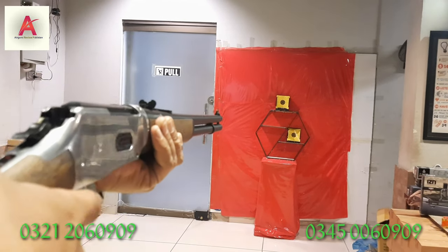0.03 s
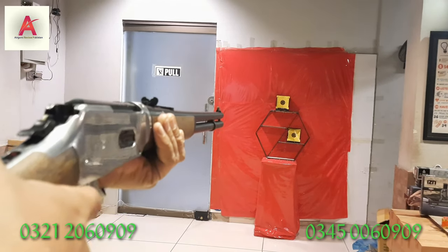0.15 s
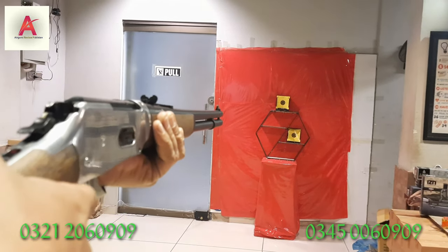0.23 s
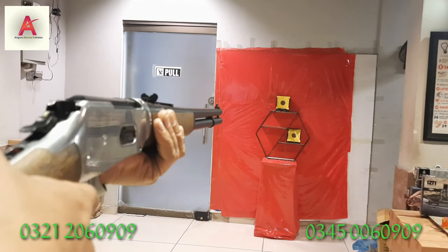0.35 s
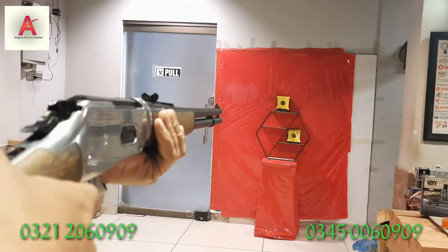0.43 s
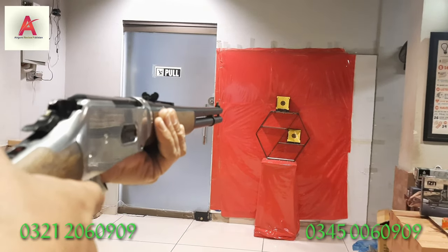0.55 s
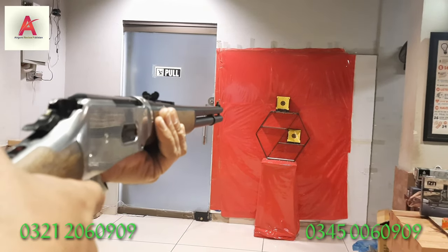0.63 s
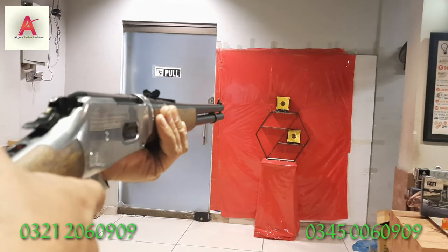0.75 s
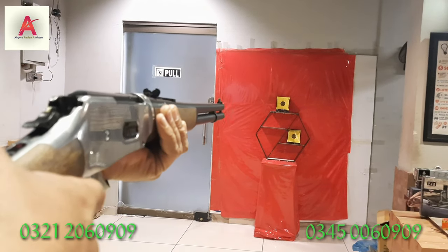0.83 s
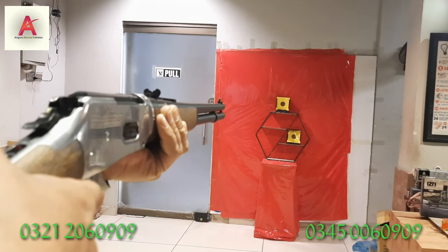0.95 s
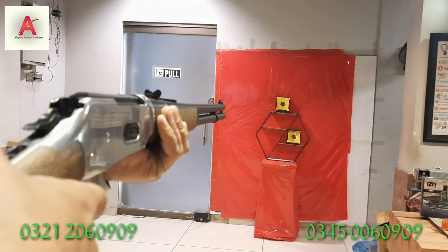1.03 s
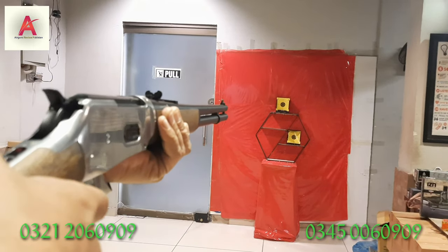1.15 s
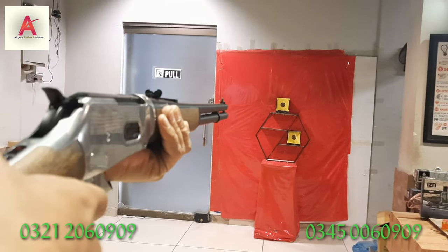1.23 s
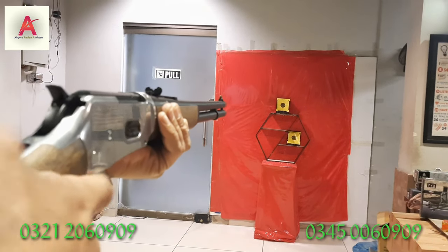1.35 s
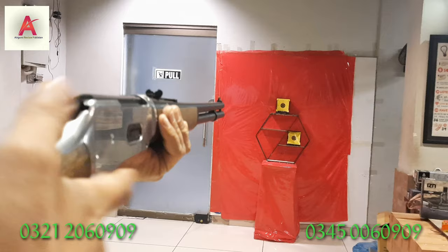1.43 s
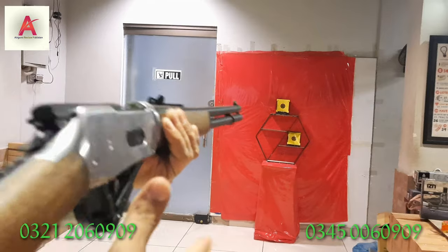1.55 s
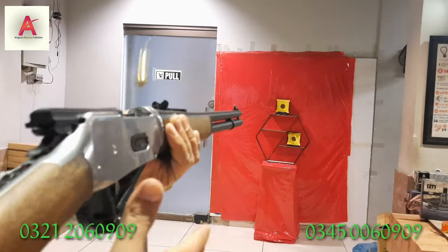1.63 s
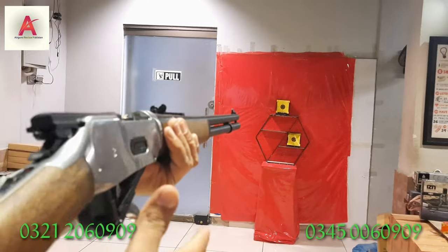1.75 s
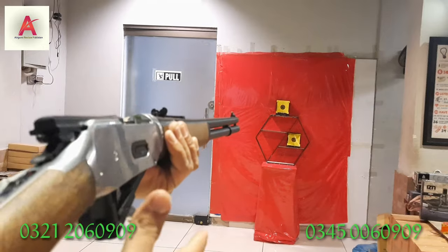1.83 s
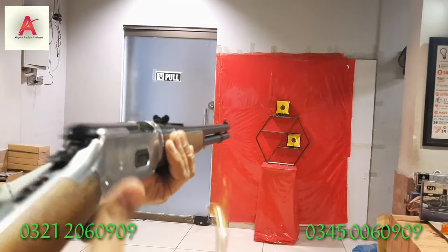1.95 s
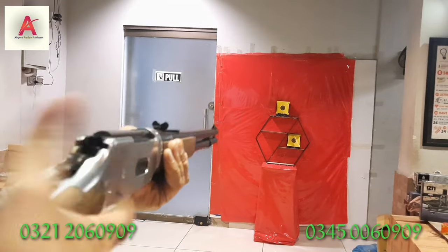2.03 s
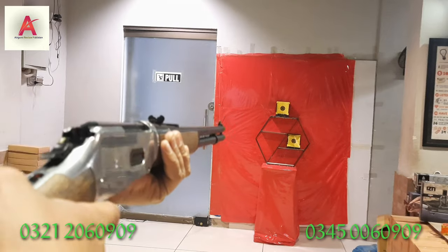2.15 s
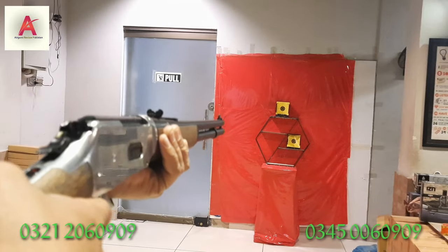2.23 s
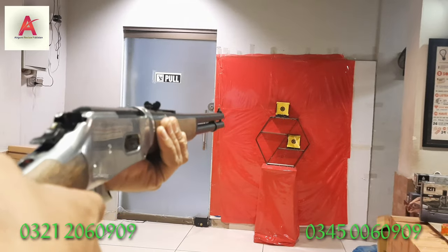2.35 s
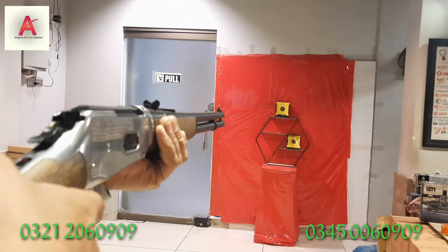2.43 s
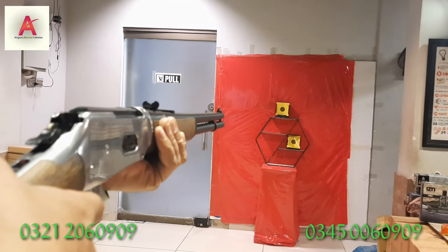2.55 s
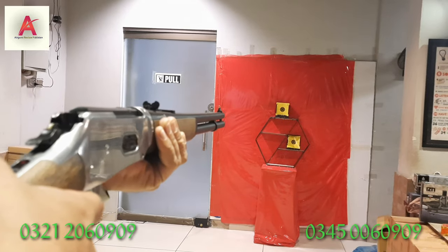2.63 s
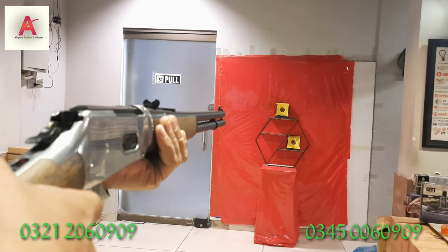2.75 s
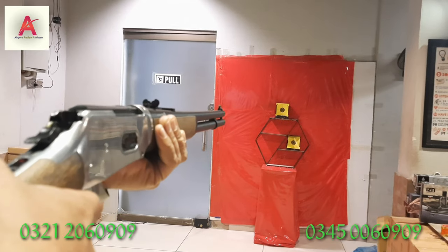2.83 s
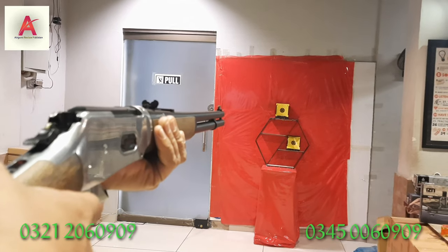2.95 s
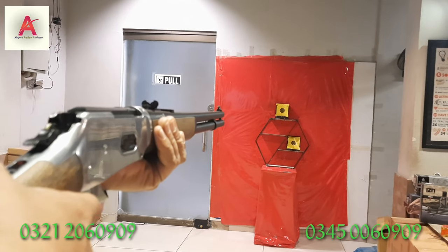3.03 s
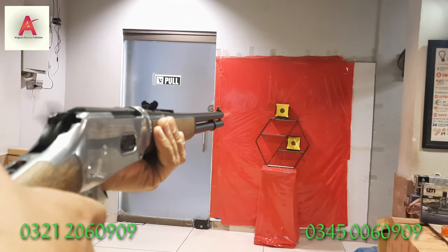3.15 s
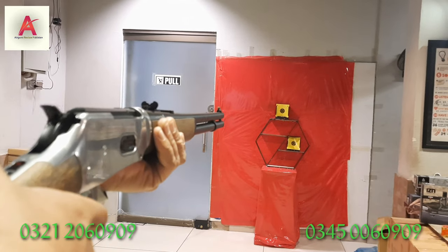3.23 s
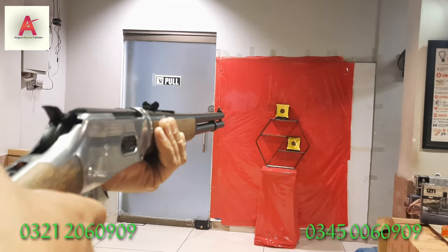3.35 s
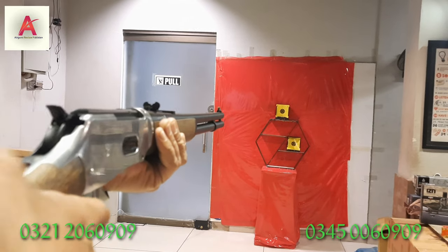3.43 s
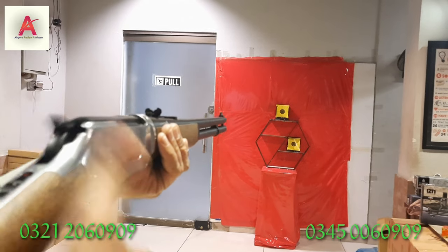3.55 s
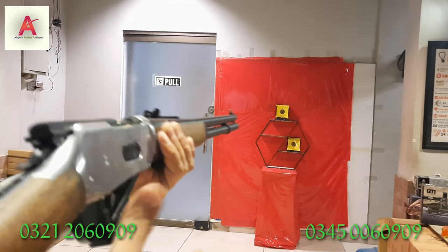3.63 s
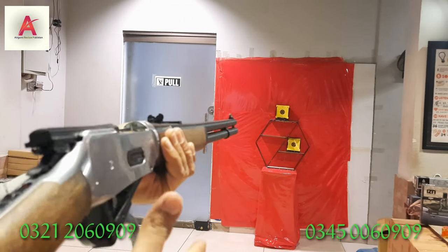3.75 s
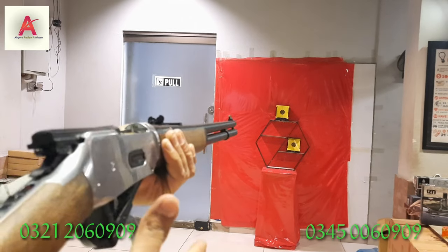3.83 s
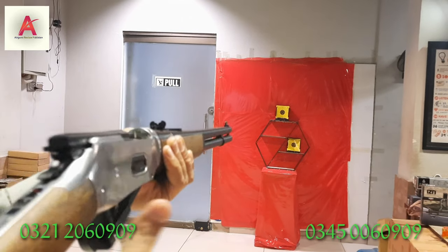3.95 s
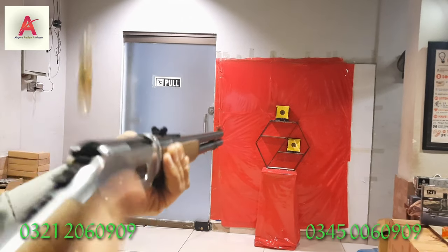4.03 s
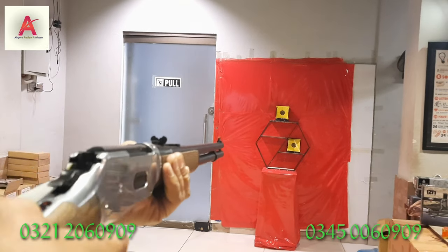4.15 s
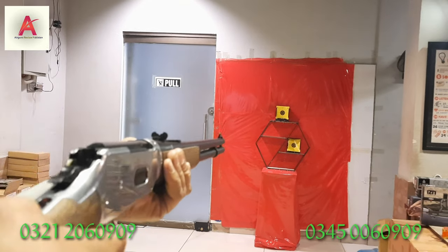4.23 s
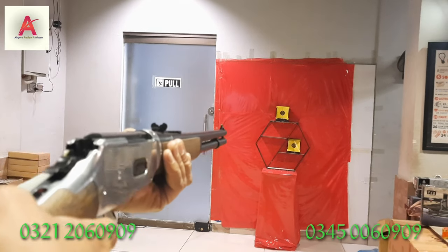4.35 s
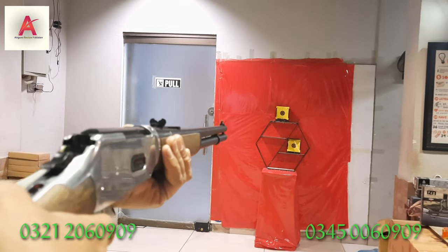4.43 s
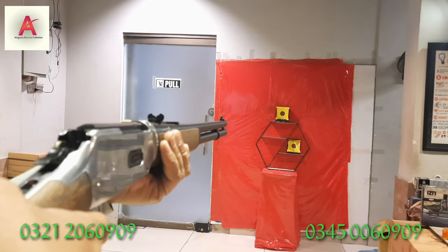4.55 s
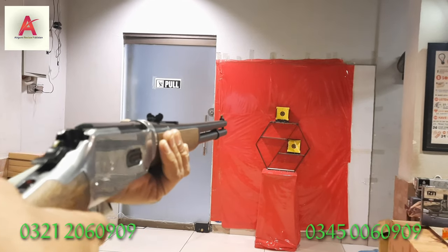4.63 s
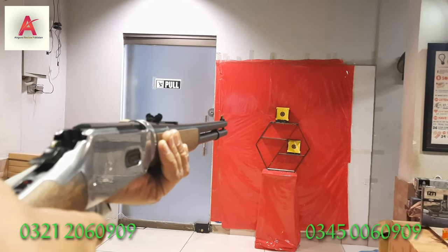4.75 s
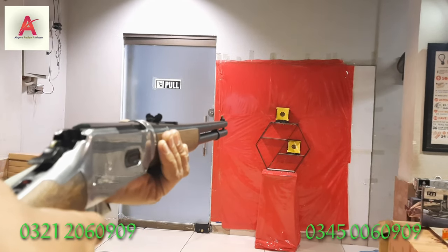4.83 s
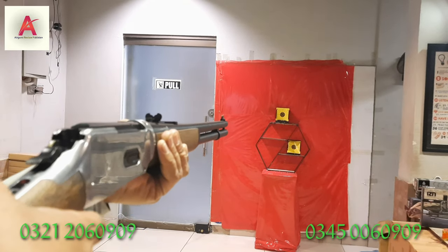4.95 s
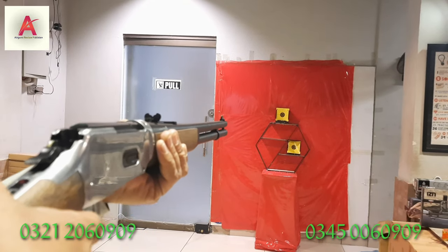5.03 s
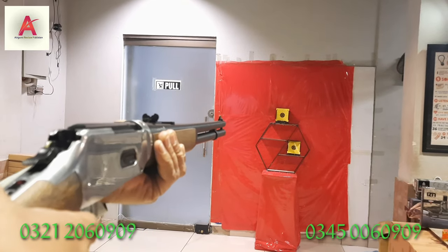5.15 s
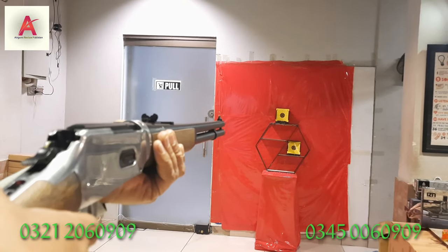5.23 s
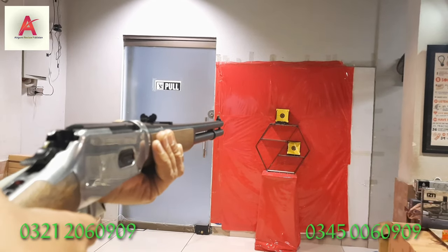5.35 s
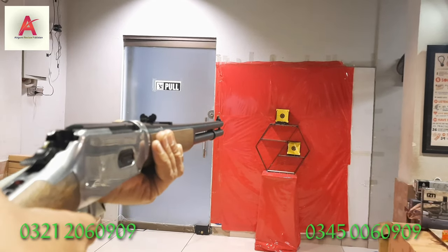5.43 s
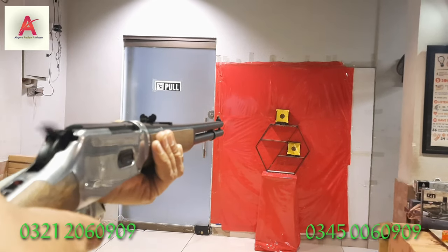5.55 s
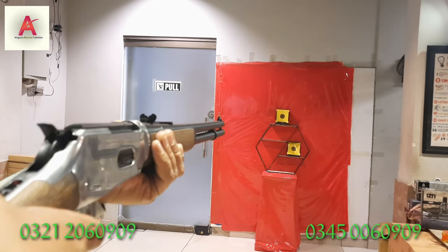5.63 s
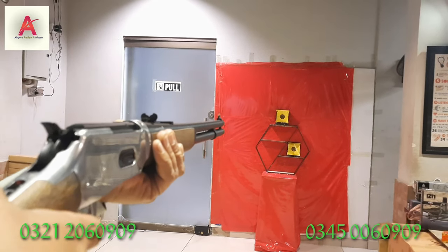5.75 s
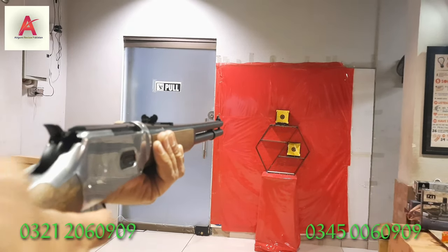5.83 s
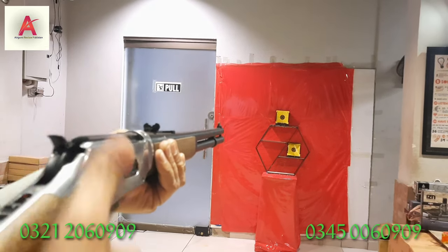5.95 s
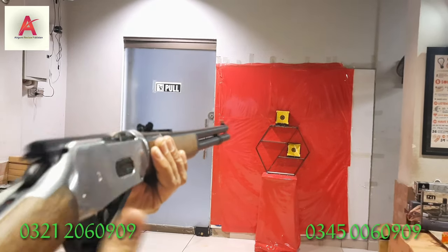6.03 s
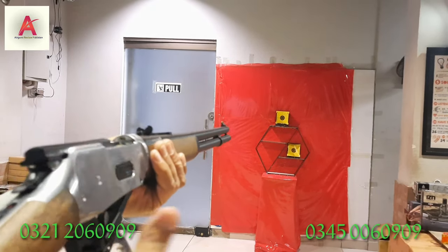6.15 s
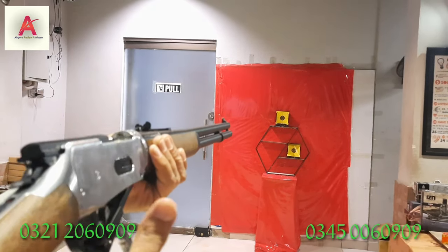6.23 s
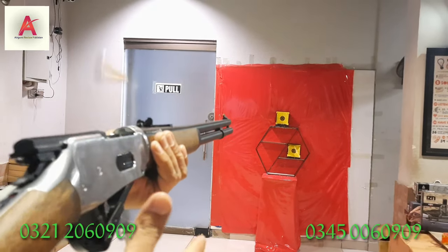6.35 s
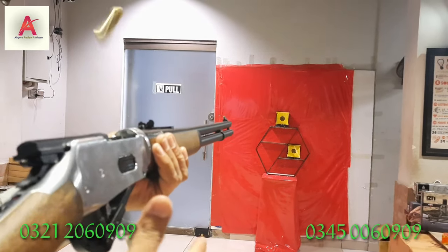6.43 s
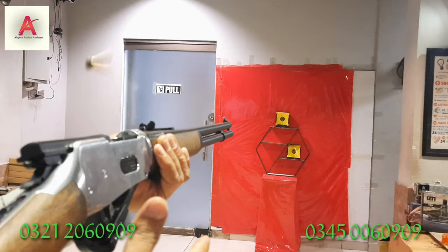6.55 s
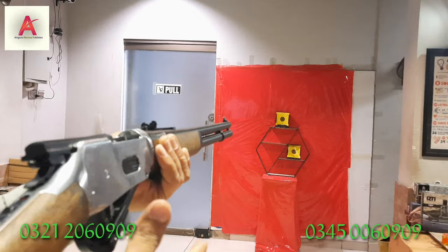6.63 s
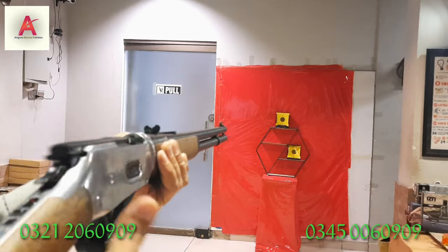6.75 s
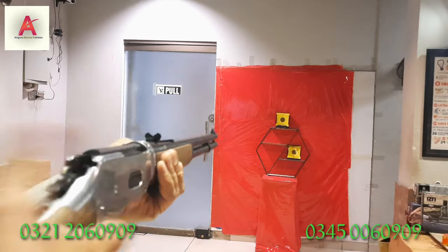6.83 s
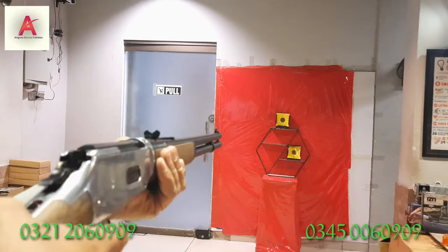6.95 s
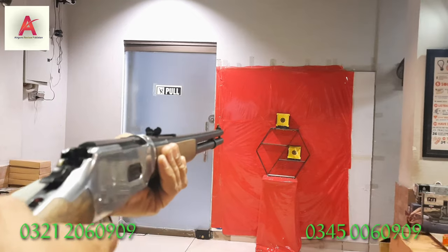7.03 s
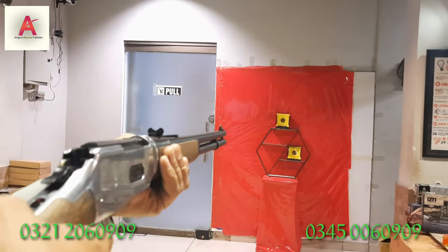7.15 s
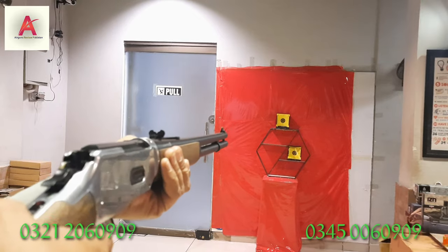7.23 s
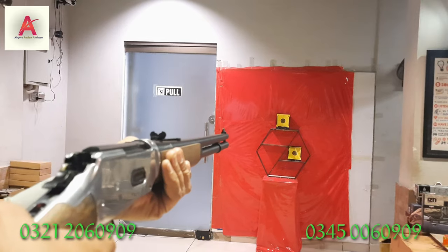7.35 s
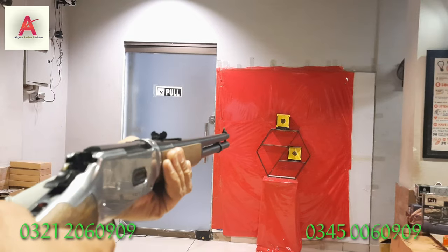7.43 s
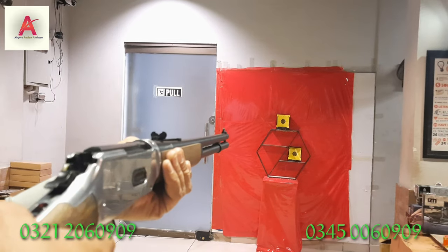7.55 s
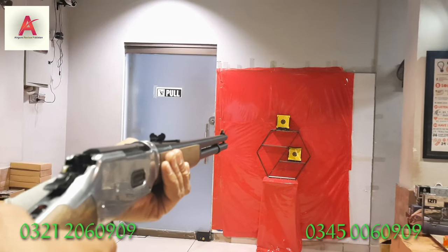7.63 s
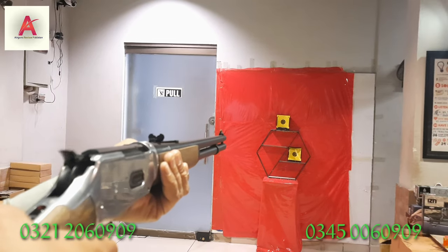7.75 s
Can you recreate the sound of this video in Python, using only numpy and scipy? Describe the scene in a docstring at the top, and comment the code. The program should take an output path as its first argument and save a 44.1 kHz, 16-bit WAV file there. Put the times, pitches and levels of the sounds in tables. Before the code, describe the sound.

A lever-action rifle cracks four times beside the microphone indoors, its steel lever clattering open and shut while ejected shells bounce on the floor.

```python
"""In a hard-walled indoor range, a lever-action air rifle fires four times right beside the microphone.
Each blast is a pressure pulse that echoes in the barrel and fills the room; a limiter holds the roar down.
After each of the first three shots the lever is thrown open and shut: steel knocks, judders and rings.
Brass shells tick, bounce and once roll on the tiles, before the first shot as well, over a faint low drone."""
import sys
import numpy as np
from scipy import signal
from scipy.fft import irfft
from scipy.io import wavfile
from scipy.ndimage import uniform_filter1d

SR = 44100
rng = np.random.default_rng(int(sys.argv[2]) if len(sys.argv) > 2 else 0)


def put_to_file(sound):
    """Save the sound as 16-bit audio at rate SR, in the file named by the first command-line argument."""
    columns = np.atleast_2d(sound).T  # one column per channel
    safe = np.clip(columns, -1, 1)
    whole_steps = np.round(safe * 32767)
    wavfile.write(sys.argv[1], SR, whole_steps.astype(np.int16))


N = 343978
TIME = np.arange(SR // 3) / SR  # seconds within one short sound


def amp(db):
    """Decibel law: twenty decibels are a factor of ten in amplitude."""
    return 10 ** (np.asarray(db) / 20)


def read(points, hz):
    """Logarithmic pitch scale: a table's value is interpolated along log frequency."""
    pitch_hz, value = np.transpose(points)
    return np.interp(np.log(hz + 1), np.log(pitch_hz), value)


def add(mix, start_s, sound):
    """Superposition: a sound is summed into the mix, in place, from its start time."""
    part = mix[max(round(start_s * SR), 0):][:len(sound)]
    part += sound[:len(part)]


def noise(spectrum, size):
    """Random phase: a shaped magnitude spectrum with random phases is steady noise, here of rms 1."""
    hz = np.fft.rfftfreq(size, 1 / SR)
    phase = np.exp(2j * np.pi * rng.random(len(hz)))
    x = irfft(amp(read(spectrum, hz)) * phase, size)
    return x / x.std()


def burst(spectrum, decay_ms, rise_ms):
    """High modal density: many dying vibrations merge into decaying noise, rms about 1 over one decay time."""
    ms = TIME * 1000
    envelope = (1 - np.exp(-ms / rise_ms)) * np.exp(-ms / decay_ms)
    x = noise(spectrum, len(TIME)) * envelope
    return x / np.sqrt(np.sum(x ** 2) * ms[1] / decay_ms)


def click(spectrum):
    """Impulse: aligned phases concentrate a spectrum into the shortest tick, here of energy 1."""
    magnitude = amp(read(spectrum, np.fft.rfftfreq(128, 1 / SR)))
    x = np.roll(irfft(magnitude), 32)
    return x / np.linalg.norm(x)


def ring(modes, spread=0):
    """Modal decay: a struck body sounds as dying sines; with spread, a changing grip detunes them."""
    out = np.zeros(len(TIME))
    for pitch_hz, level_db, t60_s in modes:
        detuned_hz = pitch_hz * (1 + spread * rng.standard_normal())
        out += amp(level_db - 60 * TIME / t60_s) * np.sin(2 * np.pi * detuned_hz * TIME)
    return out


# reverberation time of the room; columns: pitch_hz, t60_s
ROOM_T60 = [(100, 0.29), (500, 0.64), (1500, 0.75), (4000, 0.74), (7500, 0.62), (10500, 0.52),
            (15000, 0.42)]


def room(x, build_s, early=0., ripple=0.099):
    """Diffuse field: each band's energy builds up, then decays at its own rate; near surfaces add early energy."""
    hz, t, z = signal.stft(x, SR, nperseg=256, noverlap=192)
    power = uniform_filter1d(abs(z) ** 2, size=5, axis=0)
    age = t[None, :SR // 64]
    fade = amp(-60 * age / read(ROOM_T60, hz)[:, None]) ** 2
    fade *= (1 - np.exp(-(age / build_s) ** 2)) ** 2
    fade *= 1 + early * np.exp(-age / 0.014)
    energy = signal.fftconvolve(power, fade / fade.sum(1).mean(), axes=1)[:, :len(t)]
    # ten random delays, constant throughout, interfere and leave steady ripples in the spectrum
    paths = np.zeros(SR // 40)
    paths[rng.integers(SR // 300, len(paths), size=10)] = ripple * rng.choice([-1, 1], size=10)
    paths[0] = 1
    rippled = signal.oaconvolve(rng.standard_normal(N), paths)[:N]
    scatter = signal.stft(rippled, SR, nperseg=256, noverlap=192)[2]
    diffuse = scatter / scatter.std() * np.sqrt(abs(energy))
    return signal.istft(diffuse, SR, nperseg=256, noverlap=192)[1][:N]


# the shots, with relative levels of each part
# columns: start_s, pulse_db, wall_echo_db, gas_jet_db, low_boom_db, muzzle_whistle_db, hammer_db
SHOTS = [(1.08, 0, -14.5, -7.5, -14.5, -12.5, -12.5), (3.1438, 1.5, -14, -6, -17, -12.5, -11.5),
         (5.5313, 1.5, -13, -4, -16, -19, -16), (7.7134, 10, -6.5, -11, -3, 0, -8.5)]
# hard surfaces that throw the crack back; columns: delay_s, level_db
WALLS = [(0.0183, 6), (0.0348, -11), (.0365, -6), (.049, -13)]
# noise spectra of gas jet, low boom and muzzle whistle; columns: pitch_hz, level_db
JET = [(50, -5), (200, -12), (600, -4), (1000, -3), (1600, 0.5), (2900, -5), (4200, 0.5), (7000, 2),
       (10000, 4.5), (11500, -1.5), (15500, -6.5)]
BOOM = [(25, -34), (70, 0.5), (130, -6), (250, -9.5), (450, 1.5), (800, -1), (1200, -9), (1700, -14.5),
        (2500, -18), (8000, -45)]
WHISTLE = [(500, -13.5), (3000, -17.5), (5200, -7), (6300, -1), (7200, 2.5), (8600, -8), (11000, -14.5),
           (15500, -16.5)]
# modes of the receiver, also struck by the lockwork; columns: pitch_hz, level_db, t60_s
RECEIVER = [(1147, -1.5, 0.03), (1340, -13, .022), (1650, -12, 0.014), (2450, -16, 0.013)]


def shots():
    """Muzzle blast: a pressure pulse leaves, echoes up and down the barrel, and a gas jet drives the room."""
    near, forward = np.zeros(N), np.zeros(N)
    lead_s, round_trip_s = .001, .0029  # pulse centre within the crack; barrel echo period
    peak_ms = 0.24  # from the pulse's centre to either peak
    shock = -np.exp(-TIME / .00007) + .25 * np.exp(-TIME / .00028)
    for start_s, pulse_db, echo_db, jet_db, boom_db, whistle_db, _ in SHOTS:
        u = (TIME - lead_s) * 1000 / peak_ms
        crack = amp(pulse_db + 6.5) * u * np.exp(-u ** 2 / 2)
        add(crack, lead_s / 2, amp(pulse_db - 8.5) * burst(JET, decay_ms=3.0, rise_ms=.2))
        add(crack, lead_s, amp(boom_db + 7) * burst(BOOM, decay_ms=4.6, rise_ms=0.8))
        # each return from the barrel has steepened into a shock that rings the muzzle
        for k in range(1, 7):
            puff = amp(5.5) * shock + burst(WHISTLE, decay_ms=0.94, rise_ms=.05)
            add(crack, lead_s + k * round_trip_s, amp(pulse_db - 3.0 * k) * puff)
        add(crack, lead_s, amp(pulse_db - 12.0) * ring(RECEIVER, spread=.02))
        add(near, start_s - lead_s, crack)
        for delay_s, wall_db in WALLS:
            add(near, start_s - lead_s + delay_s, amp(echo_db + wall_db) * crack)
        add(forward, start_s, amp(jet_db) * burst(JET, decay_ms=20.0, rise_ms=19.0))
        add(forward, start_s, amp(whistle_db) * burst(WHISTLE, decay_ms=24, rise_ms=3.4))
        add(forward, start_s, amp(boom_db) * burst(BOOM, decay_ms=14.4, rise_ms=1.4))
    return near + amp(-12.5) * forward + amp(1) * room(forward, build_s=0.015, ripple=0.2)


# the trigger clicks; columns: start_s, level_db (relative)
TRIGGERS = [(1.004, -29), (3.09, -27), (5.476, -22.5), (7.651, -22.5)]
# spectrum of knocking steel, shared by every clack of the action; columns: pitch_hz, level_db
STEEL = [(100, -28.5), (400, 0.5), (1000, -0.5), (2100, 1.5), (3000, -3.5), (4800, 0.5), (7500, 0),
         (10000, 1), (11300, -9.5), (15500, -8)]


def lockwork():
    """Impact excitation: the trigger click and the hammer blow each set the receiver's modes ringing."""
    out = np.zeros(N)
    lock_s = .0087  # the hammer lands this long before the shot
    trigger_tick_db, hammer_tick_db = -20, -9.5  # extra level of each steel tick
    pulls = [(start_s, db, trigger_tick_db) for start_s, db in TRIGGERS]
    falls = [(start_s - lock_s, db, hammer_tick_db) for start_s, *_, db in SHOTS]
    for start_s, db, tick_db in pulls + falls:
        add(out, start_s, amp(db + tick_db - 8) * burst(STEEL, decay_ms=8.4, rise_ms=.6))
        add(out, start_s, amp(db - 3.5) * ring(RECEIVER, spread=0.026))
    return out


# the bolt slides and judders in its track; columns: start_s, length_s, level_db
SLIDES = [(1.465, 0.074, -29), (1.923, 0.045, -24), (3.527, 0.028, -33), (3.573, 0.041, -26.5),
          (3.949, 0.08, -31.5), (5.943, 0.035, -32), (5.986, .05, -30.5), (6.733, 0.048, -33),
          (6.805, 0.016, -26)]
# modes of the wooden stock, also shaken by every knock; columns: pitch_hz, level_db, t60_s
STOCK = [(460, -15.5, 0.019), (486, 1.5, 0.06), (575, 1, .04), (634, -12.5, 0.044), (975, -15, .04),
         (1180, -0.5, 0.039), (1680, -15, 0.015)]


def slides():
    """Stick-slip friction: a quick run of small jolts keeps the stock ringing and the steel rasping."""
    out = np.zeros(N)
    for start_s, length_s, level_db in SLIDES:
        jolts = np.zeros(len(TIME))
        at_s = np.cumsum(rng.uniform(.001, .005, 60))
        size = rng.standard_normal(60)
        inside = at_s < length_s
        jolts[(at_s[inside] * SR).astype(int)] = size[inside]
        body = ring(STOCK, spread=0.04) + amp(-2) * burst(STEEL, decay_ms=1.0, rise_ms=.1)
        judder = signal.fftconvolve(jolts, body)
        rms = np.sqrt(np.sum(judder ** 2) / (length_s * SR))
        add(out, start_s, amp(level_db) * judder / rms)
    return out


# single knocks of bolt and lever along their travel; columns: start_s, clack_db (steel), thud_db (stock)
KNOCKS = [(1.448, -27, -30), (1.465, -22, -17.5), (1.475, -22, -18), (1.49, -21, -19.5), (1.506, -16, -15),
          (1.521, -12.5, -32), (1.8895, -36, -32), (3.49, -28, -33), (3.539, -24, -19), (3.55, -23, -18),
          (3.572, -29, -21), (3.594, -12.5, -34), (4.0798, -16.5, -32.5), (5.953, -21, -24),
          (5.965, -24, -18), (5.989, -41, -20), (6.015, -16.5, -32), (6.657, -44, -44.5), (6.694, -45, -41),
          (6.787, -19.5, -22.5)]
# the lever reaches its open stop; columns: start_s, level_db (relative)
STOPS = [(1.592, -0.5), (3.657, -1), (6.2993, -2)]
# at every stop: a faint first touch, then lever, carrier and ejector in turn
# columns: delay_s, clack_db, thud_db, decay_ms
STOP_PARTS = [(-.003, -27.5, -29.5, 3), (0, -12.5, -20, 4.6), (.0065, -16.5, -23.5, 6.5),
              (.012, -7, -18, 2.2)]
# the bolt runs forward and picks up the next shell; columns: start_s (first firm contact), clack_db,
# thud_db, growth_db (clack, per contact), takeup_s (spacing), takeup_db (clack)
FEEDS = [(1.923, -17.5, -16, 6, .0075, -22.5), (3.966, -15, -17, 1, .017, -32),
         (6.7353, -17, -19, 0, .0135, -23)]
# the lever snaps home; columns: start_s, clack_db, count (contacts on the way in), early_db (their clack),
# rebound_db, loop_db (ring of the lever loop)
LATCHES = [(1.9928, -4.5, 1, -2.5, -10, -23.5), (4.049, -7, 2, -4.5, -19, -23),
           (6.8234, 0, 1, -20, -15, -19.5)]


def knocks():
    """Successive impacts: yields each contact of open, stop, feed and latch: s, clack dB, thud dB, decay ms."""
    knock_ms = 1.8
    for start_s, clack_db, thud_db in KNOCKS:
        yield start_s, clack_db, thud_db, knock_ms
    for start_s, db in STOPS:
        for delay_s, clack_db, thud_db, decay_ms in STOP_PARTS:
            yield start_s + delay_s, db + clack_db, db + thud_db, decay_ms
    feed_gap_s, feed_ms = .0098, 3.24  # spacing and decay of the firm contacts
    for start_s, clack_db, thud_db, growth_db, takeup_s, takeup_db in FEEDS:
        # lighter touches take up the slack first, weaker with each step back
        for k in (1, 2):
            yield start_s - k * takeup_s, takeup_db - 12.5 * (k - 1), thud_db - 7 * k, feed_ms
        for k in (0, 1, 2):
            yield start_s + k * feed_gap_s, clack_db + k * growth_db, thud_db - k, feed_ms
    latch_gap_s, latch_ms = .0102, 1.6
    for start_s, clack_db, count, early_db, rebound_db, _ in LATCHES:
        contacts = [early_db] * round(count) + [clack_db, rebound_db]
        for k, db in enumerate(contacts, -round(count)):
            # the thud grows more slowly than the clack
            yield start_s + k * latch_gap_s, db, -12.5 + .45 * db, latch_ms
    # two loose parts knock at random during each slide
    for start_s, length_s, db in SLIDES:
        for place, size in rng.random(size=(2, 2)):
            clack_db = db - 0.5 + (2 * size - 1)
            yield start_s + place * length_s, clack_db, clack_db + 1, knock_ms


# noise spectrum of the stock's thud; columns: pitch_hz, level_db
THUD = [(25, -28.5), (70, -2.5), (220, -21.5), (440, 0.5), (800, -3.5), (1400, -4.5), (2500, -8),
        (6000, -36)]
# modes of the bolt, of the frame humming after a stop, and of the lever loop
# columns: pitch_hz, level_db, t60_s
BOLT = [(1500, -3.5, 0.041), (2097, -2, 0.043), (2440, -12.5, .025), (4590, -12.5, 0.027),
        (5420, -4.5, 0.02), (7520, 2.5, 0.014), (8270, -2.5, 0.027)]
FRAME = [(1710, -55.5, .8), (2030, -48.5, .8), (2050, -50.5, .8)]
LOOP = [(938, 1.5, 0.15), (1809, -23, 0.27), (6110, -25, 0.47), (6729, -22, 0.68), (9700, -19, .2),
        (11870, -27, .25)]
# the shell is struck in the action
# columns: start_s, level_db (relative), upper_db (upper mode of each pair), t60_s
SHELL_RINGS = [(1.6032, -30.5, -10, 0.43), (1.939, -8.5, -8, 0.046), (3.9867, -22.5, 7.5, 0.086),
               (6.756, -20.5, -11, 0.12), (6.796, -26, -11, 0.06)]
# close mode pairs of a thin tube; columns: low_hz, high_hz, pair_db
SHELL = [(9700, 10480, 0.5), (13480, 14090, -10)]


def action():
    """Coupled vibration: knocking steel parts shake the wooden stock; shell, frame and lever loop ring on."""
    out = slides() + lockwork()
    seat_s = .0005  # the chatter begins this long before the parts seat
    for start_s, clack_db, thud_db, decay_ms in knocks():
        add(out, start_s - seat_s, amp(clack_db + 1.5) * burst(STEEL, decay_ms, rise_ms=2.2))
        add(out, start_s, amp(clack_db - 11) * ring(BOLT, spread=0.015))
        add(out, start_s, amp(thud_db - 7.5) * burst(THUD, decay_ms=6.8, rise_ms=1.6))
        stock = ring(STOCK, spread=0.065) * (1 - np.exp(-TIME / 0.0026))
        add(out, start_s, amp(thud_db - 0.5) * stock)
    for start_s, level_db, upper_db, t60_s in SHELL_RINGS:
        for low_hz, high_hz, pair_db in SHELL:
            pair = ring([(low_hz, 0, t60_s), (high_hz, upper_db, t60_s)])
            add(out, start_s, amp(level_db + pair_db + 3.0) * pair)
    for start_s, level_db in STOPS:
        add(out, start_s, amp(level_db) * ring(FRAME))
    for start_s, *_, loop_db in LATCHES:
        add(out, start_s, amp(loop_db + 5) * ring(LOOP))
    return out + amp(-14.0) * room(out, build_s=0.0025, early=3.0)


# shells land on the tiles
# columns: start_s, level_db (relative), tilt_db_per_octave (brightness), count (taps as the shell rocks)
BOUNCES = [(0.2812, -22.5, -4.5, 1), (0.4508, -21, -1, 1), (0.793, -32.5, 8.5, 4), (0.9085, -35, 8, 2),
           (0.985, -39, -1, 1), (1.014, -36, 10, 2), (2.3094, -15.5, 4.5, 1), (2.7272, -19.5, 7, 1),
           (2.977, -23.5, 9.5, 1), (3.127, -31.5, 6, 1), (4.549, -22.5, -4.5, 1), (4.737, -29, -2, 1),
           (5.021, -29.5, 2, 1), (5.193, -28, 7, 1), (5.2788, -37.5, 2, 1), (7.0117, -17.5, -0.5, 1),
           (7.42, -24.5, -6.5, 1)]


def taps():
    """Rocking impact: a landed shell tips from end to end; yields s, dB and tilt dB per octave of each tap."""
    rock_s, other_end_s = .0097, .0017  # from tap to tap, and from a tap to the shell's other end
    for start_s, level_db, tilt_db, count in BOUNCES:
        for k in range(round(count)):
            tap_s, tap_db = start_s + k * rock_s, level_db - .5 * k
            yield tap_s, tap_db, tilt_db
            yield tap_s + other_end_s, tap_db - 6.5, tilt_db


# spectrum of brass on tile before the tilt; columns: pitch_hz, level_db
TILE = [(300, -30.5), (1400, -29.5), (2400, -3), (3300, -0.5), (4200, 3.5), (6500, 0), (8000, 7),
        (10200, -1), (12000, -8.5), (15500, -19.5)]
# modes of one landing that rings on; columns: pitch_hz, level_db, t60_s
PING = [(3440, -40.5, 0.54), (3380, -37, .5), (3340, -17, 0.023), (2760, -30, 0.026)]
# a shell rolls to rest: its envelope; columns: time_s, level_db
ROLL_DB = [(5.19, -70), (5.22, -50), (5.35, -50), (5.5, -58), (5.7, -87)]
# spectrum of the roll, relative; columns: pitch_hz, level_db
ROLL = [(2000, -42), (3500, -8), (4800, -6), (5800, 5), (6800, -13), (8100, 0), (9200, -15), (12000, -44)]


def shells():
    """Direct and reverberant sound: brass ticks and rolls a little way off, with a ceiling echo and much room."""
    direct, spread, out = np.zeros((3, N))
    for start_s, level_db, tilt_db in taps():
        colour = [(hz, db + tilt_db * np.log2(hz / 6000)) for hz, db in TILE]
        add(direct, start_s, amp(level_db + 1) * burst(colour, decay_ms=0.86, rise_ms=0.025))
        # summed over all directions, the shell's sound is more even and a little brighter
        evened = [(hz, 0.61 * db + 1.7 * np.log2(hz / 6000)) for hz, db in colour]
        add(spread, start_s, amp(level_db + 17.0) * click(evened))
    add(out, .0112, amp(-8.0) * direct)  # ceiling echo
    ping_s = .4497
    add(out, ping_s, ring(PING))
    add(spread, ping_s, amp(-10.5) * ring(PING))
    time_s, level_db = np.transpose(ROLL_DB)
    envelope = np.interp(np.arange(N) / SR, time_s, amp(level_db), left=0, right=0)
    out += noise(ROLL, N) * envelope
    return direct + out + room(spread, build_s=0.0096)


# spectrum of the low air rumble, relative; columns: pitch_hz, level_db
AIR = [(20, -24), (33, -14.5), (47, -3), (70, 2), (100, 0), (145, -3.5), (230, -7.5), (450, -6.5),
       (800, -11.5), (1100, -14.5), (1500, -26.5), (3000, -35), (9000, -43), (12000, -68.5)]
# level of the rumble over time; columns: time_s, level_db
AIR_DB = [(0.0, -49), (1.02, -44), (3.56, -49.5), (4.3, -50.5), (5.63, -47.5), (6.41, -56), (7.8, -49.5)]
# faint drone of the building, which swells with the rumble; columns: pitch_hz, level_db (re the rumble)
DRONE = [(47, -9), (70, -3), (140, -9.5), (179, -8.5)]


def background():
    """Ambient noise: low rumble and phase-wandering drones, and the reverberant tail of an earlier clack."""
    time_s, level_db = np.transpose(AIR_DB)
    t = np.arange(N) / SR
    air = noise(AIR, N)
    for pitch_hz, drone_db in DRONE:
        wander = np.cumsum(rng.standard_normal(N)) / np.sqrt(SR)
        drift = .4 * wander  # cycles, growing by .4 per root second
        air += amp(drone_db) * np.sin(2 * np.pi * (pitch_hz * t + drift))
    air *= amp(np.interp(t, time_s, level_db))
    earlier = np.zeros(N)
    add(earlier, 0, burst(STEEL, decay_ms=5.8, rise_ms=0.25))
    tail = room(earlier, build_s=0.011)[SR // 7:]
    add(air, 0, amp(-20.5) * tail)
    return air


def scene():
    """Superposition at one point: every source reaches one microphone, giving two equal channels."""
    return np.tile(shots() + action() + shells() + background(), (2, 1))


def record(dry):
    """Dynamic compression: a limiter falls fast and recovers slowly; then bass cut, soft overload, band limit."""
    power_db = 10 * np.log10(abs(uniform_filter1d(dry[0] ** 2, size=440)) + 1e-12)
    recovery_db = np.arange(N) / SR * 110  # the held level falls 110 dB per second
    held_peak_db = np.maximum.accumulate(power_db + recovery_db) - recovery_db
    over_db = np.maximum(held_peak_db + 14.5, 0)  # excess above a -14.5 dB threshold
    held = dry * amp(-.8 * uniform_filter1d(over_db, size=100))
    held = signal.sosfilt(signal.butter(2, 36, "highpass", fs=SR, output="sos"), held)
    clipped = held / (1 + held ** 6) ** (1 / 6)
    edge_hz = 15700
    lowpass = signal.firwin(255, edge_hz, window=("kaiser", 8), fs=SR)
    return signal.oaconvolve(clipped, lowpass[None], "same")


dry = scene()
out = record(dry)
put_to_file(out)
```